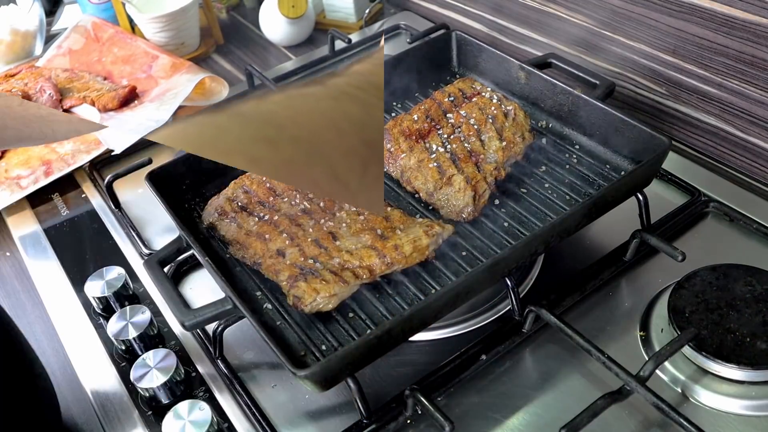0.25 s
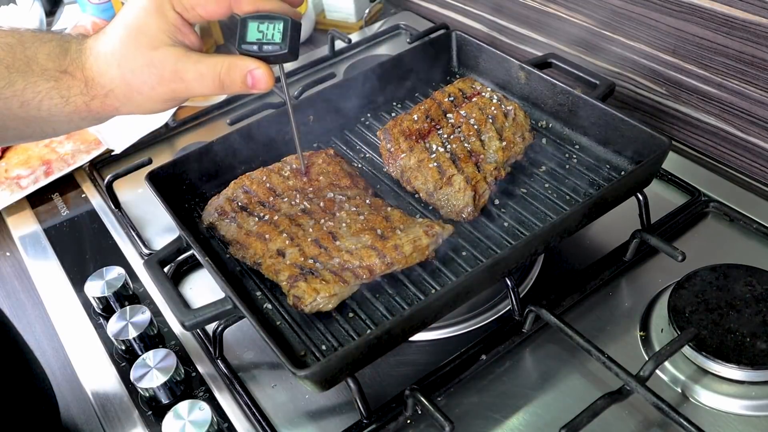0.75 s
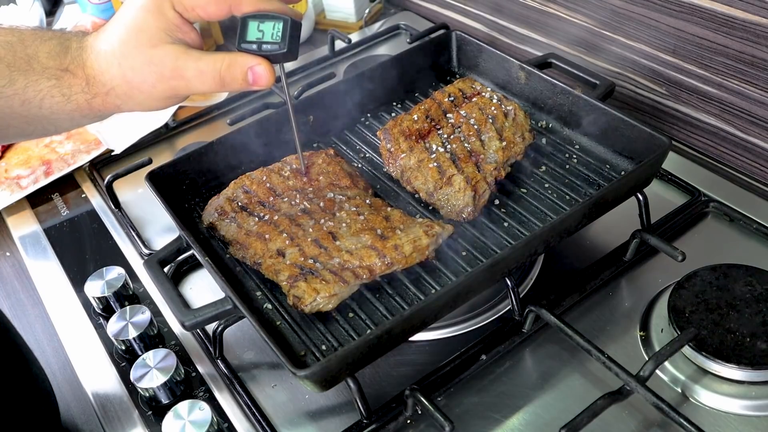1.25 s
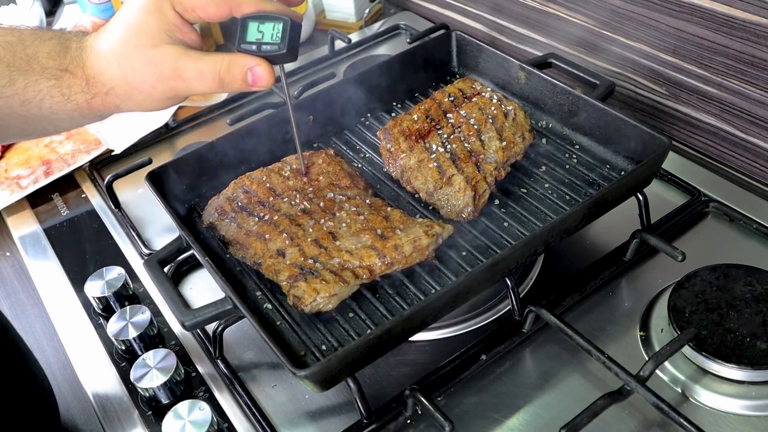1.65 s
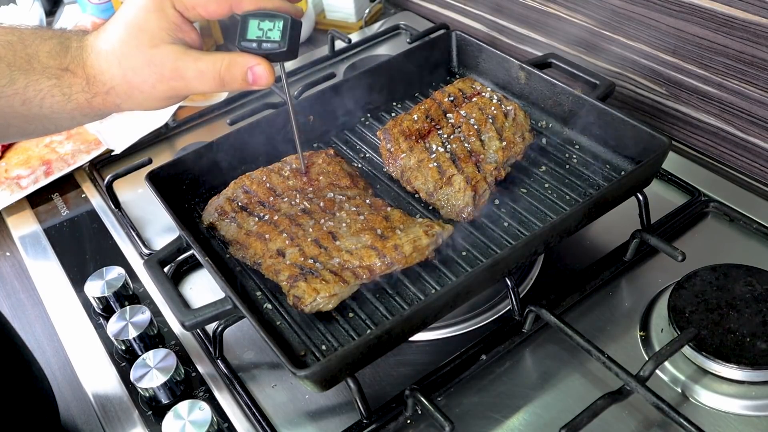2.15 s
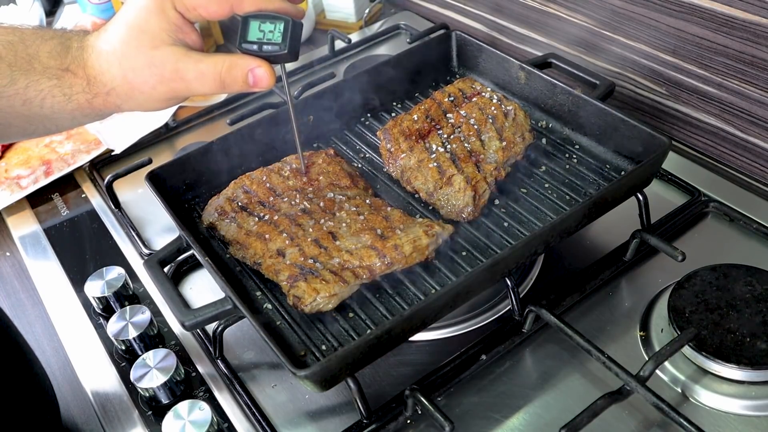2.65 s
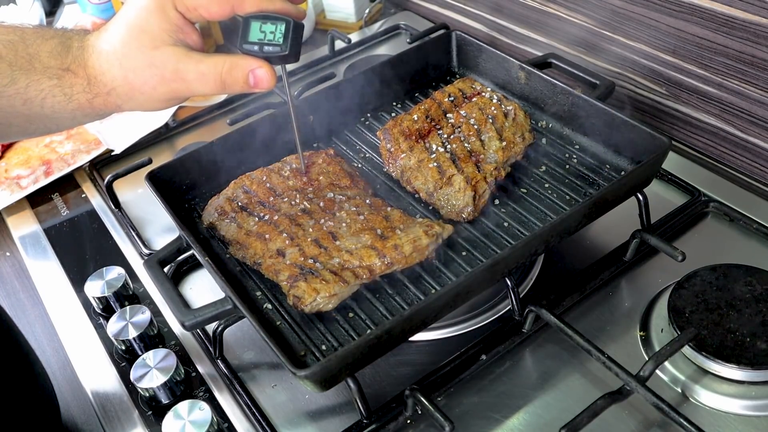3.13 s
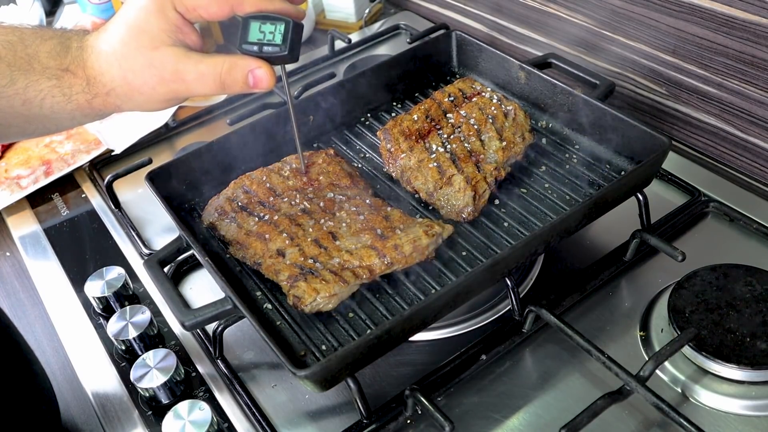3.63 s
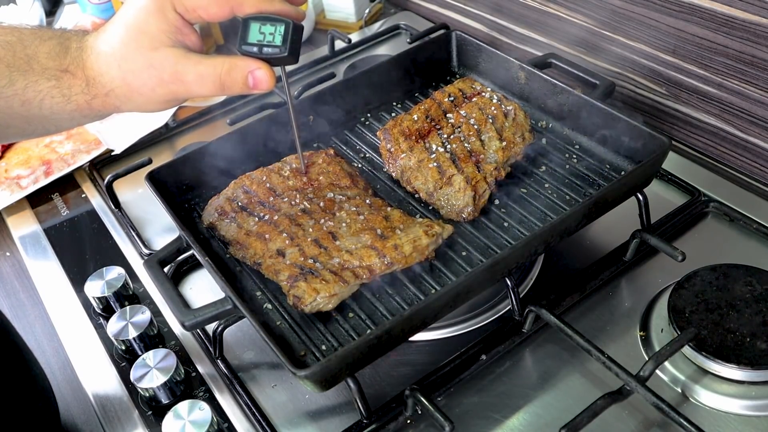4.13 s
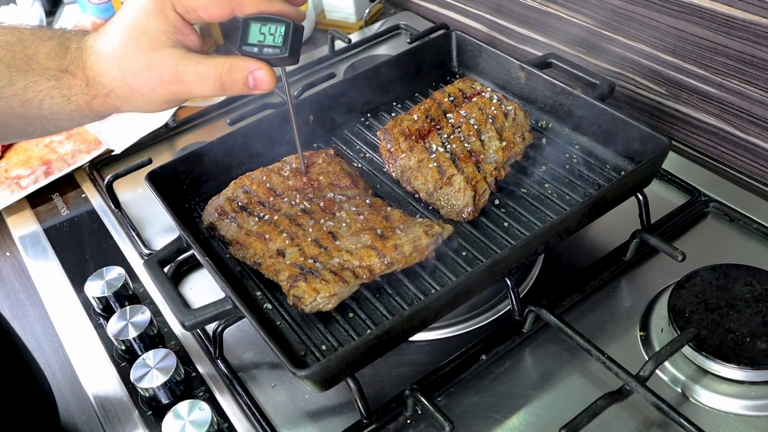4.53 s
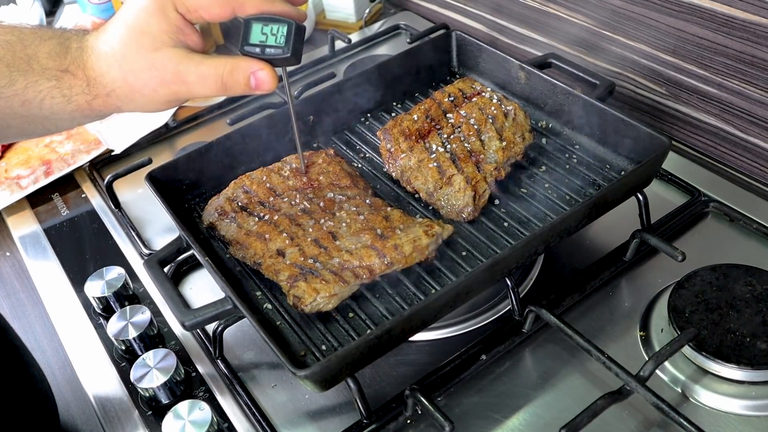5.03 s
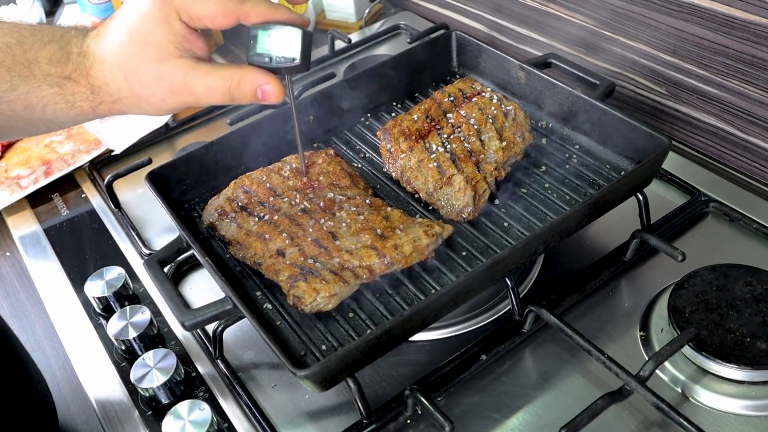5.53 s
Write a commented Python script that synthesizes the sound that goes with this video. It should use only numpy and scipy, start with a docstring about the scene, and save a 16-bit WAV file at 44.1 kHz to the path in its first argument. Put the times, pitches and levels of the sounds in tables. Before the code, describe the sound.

A steady, already running sizzle of meat in hot fat, crisp and airy with a slight metallic pan colour. Random tiny crackles cover it; a strong pop comes just after two seconds, then clusters of snaps until the end. Brief spurts of steam blend in. Close microphone, centred, short dry kitchen reflections, soft low gas rush, and one barely noticeable dull bump near five seconds.

```python
"""A small kitchen: two steaks sear in a cast-iron grill pan, heard close up and in mono.
Water boiling out into hot fat is a dense sizzle of tiny decaying bursts and noise, coloured by the pan.
Single drops pop as filtered clicks with echoes off the pan; juice spurts into steam as swells of hiss.
Pops and spurts stir a short room tail; under it all are a noise-made gas flame, a faint hum and one soft bump."""
import sys
import numpy as np
from scipy import signal
from scipy.fft import rfft, irfft, next_fast_len
from scipy.io import wavfile
from scipy.ndimage import map_coordinates

SR = 44100
rng = np.random.default_rng(int(sys.argv[2]) if len(sys.argv) > 2 else 0)


def generate_wav(sig):
    """Save sig (samples, or channels by samples) to the path in sys.argv[1] as 16-bit PCM at SR."""
    pcm = np.round(np.clip(np.atleast_2d(sig).T, -1, 1) * 32767).astype(np.int16)
    wavfile.write(sys.argv[1], SR, pcm)


N = 255202  # length in samples


def amp(db):
    """Decibels to gain."""
    return 10 ** (np.asarray(db) / 20)


def unit(x):
    """x scaled to rms 1."""
    return x / np.sqrt(np.mean(x ** 2) + 1e-20)


def along(points, hz):
    """A curve of (Hz, value) points, read on a log frequency axis."""
    point_hz, values = np.transpose(points)
    return np.interp(np.log(hz + 1), np.log(point_hz), values)


def wobble(rate):
    """A smooth random curve through `rate` random knots a second."""
    knots = rng.standard_normal(int(N * rate / SR) + 4)
    return map_coordinates(knots, [np.arange(N) * rate / SR])


def coloured(x, gain_db):
    """x through a minimum-phase filter, so attacks stay sharp; gain_db maps Hz to dB."""
    m = 2 * next_fast_len(len(x) // 2 + 4096)
    gain = amp(gain_db(np.fft.rfftfreq(m, 1 / SR)))
    cepstrum = irfft(np.log(gain + 1e-6), m)
    # folding the cepstrum onto positive time makes the filter causal
    cepstrum[1:m // 2] *= 2
    cepstrum[m // 2 + 1:] = 0
    response = np.exp(rfft(cepstrum))
    return irfft(rfft(x, m) * response, m)[:len(x)]


def hump(centre_hz, q):
    """Gain in dB of one broad resonance, as a function of frequency."""
    return lambda hz: -10 * np.log10(1 + (q * (hz / centre_hz - centre_hz / (hz + 1))) ** 2)


def lift_db(resonances, hz):
    """The summed lift in dB of (Hz, width in Hz, dB) resonances at each frequency."""
    return sum(db / (1 + (2 * (hz - centre) / width) ** 2) for centre, width, db in resonances)


def add(track, s, sound):
    """Mix a sound into the track at time s, cut off at the track's end."""
    part = track[max(round(s * SR), 0):][:len(sound)]
    part += sound[:len(part)]


# The kitchen's steady hum. Each row: frequency in Hz, rms level in dB.
HUM_TONES = [(40, -69), (62.5, -56), (100, -69), (125, -75)]


def hum():
    """A few low sine tones whose phases wander a little, so the hum is slightly unsteady."""
    t = np.arange(N) / SR
    tones = 0
    for hz, db in HUM_TONES:
        drift = 0.32 * wobble(4.74)  # radians
        tones = tones + amp(db) * np.sqrt(2) * np.sin(2 * np.pi * hz * t + drift)
    return tones


# The colour of the gas flame. Each row: frequency in Hz, relative level in dB per Hz.
FLAME_COLOUR = [(15, -11), (35, -14), (70, -6.5), (140, -1.5), (250, -3.5), (380, -2.5), (550, -5),
                (1200, -8.5), (4000, -60)]


def burner(flame_db=-48):
    """A burning gas jet's turbulence makes a low rush: steady noise, coloured."""
    return amp(flame_db) * unit(coloured(rng.standard_normal(N), lambda hz: along(FLAME_COLOUR, hz)))


def bump(at_s=5.0, level_db=-45.5, centre_hz=260, half_s=0.12):
    """A soft low bump: resonant noise under a bell-shaped swell, half_s from peak to 1/e."""
    t = np.arange(N) / SR
    rumble = unit(coloured(rng.standard_normal(N), lambda hz: 2 * hump(centre_hz, q=1.6)(hz)))
    return amp(level_db) * rumble * np.exp(-((t - at_s) / half_s) ** 2)


def kitchen(x, level_db=-12, t60_s=0.3, size=SR // 3):
    """The small room's diffuse answer: a decaying noise tail that starts after 5 ms."""
    t = np.arange(size) / SR
    tail = rng.standard_normal(size) * amp(-60 * t / t60_s) * (t > .005)
    return amp(level_db) * signal.fftconvolve(x, tail / np.linalg.norm(tail))[:N]


# The bursting bubbles together. Each row: frequency in Hz, relative level in dB per Hz.
SIZZLE_COLOUR = [(150, -18), (600, -16.5), (850, -10), (1100, -9), (1300, -4), (3200, -8.5), (4500, -3),
                 (5700, -4.5), (7000, -1.5), (8500, 1.5), (10000, -5.5), (11200, -8), (12800, -3),
                 (15600, -8.5)]
# Air resonances of the pan and the hob. Each row: centre in Hz, width in Hz, lift in dB.
PAN_RESONANCES = [(723, 40, 8.5), (944, 41, 4), (1375, 22, 7.5), (2240, 560, 4), (2890, 340, 5),
                  (3734, 670, 5.5), (5220, 69, 5), (6075, 140, 4)]


def sizzle_db(hz):
    """The colour of anything that bursts in the pan: bubbles plus pan resonances."""
    return along(SIZZLE_COLOUR, hz) + lift_db(PAN_RESONANCES, hz)


# Juice that runs onto the iron and flashes to steam.
# Each row: start in seconds, level in dB before level_db, pitch in Hz, nominal length in seconds.
STEAM_SPURTS = [(2.25, -21, 13000, 0.022), (2.295, -27, 8550, 0.058), (2.376, -23, 8900, 0.096),
                (3.817, -26, 7600, 0.089), (4.221, -20.5, 7000, 0.041), (4.593, -24.5, 6200, .04)]


def spurts(level_db=-1, q=1.1, uneven_db=11, sputter_db=1.6, sputter_per_s=200):
    """A swarm of like-sized bubbles: uneven noise around one pitch that swells quickly and dies away."""
    track = np.zeros(N)
    t = np.arange(SR // 3) / SR
    for s, db, pitch_hz, length in STEAM_SPURTS:
        swarm = rng.standard_normal(len(t)) * amp(uneven_db * rng.uniform(-1.1, 1, len(t)))
        # a higher q makes the bubbles more alike in size
        hiss = unit(coloured(swarm, lambda hz: 2 * hump(pitch_hz, q)(hz) + sizzle_db(hz)))
        age = 3 * t / length  # the swell peaks at age 1, a third of the length
        swell = age * np.exp(1 - age)
        sputter = sputter_db * wobble(sputter_per_s)[:len(t)]
        add(track, s, amp(db + level_db + sputter) * swell * hiss)
    return track


def paths(wall_s=.0013, wall_db=-2, rib_db=-13, rib_t60=0.003, scatter_db=-24, scatter_t60=0.072, size=SR // 25):
    """The way from one spot in the pan: direct, off the ribs and the wall, and scattered by the hob."""
    t = np.arange(size) / SR
    ribs = amp(rib_db - 60 * t / rib_t60)
    hob = amp(scatter_db - 60 * t / scatter_t60)
    response = (ribs + hob) * rng.standard_normal(size)
    response[0] = 1  # direct sound
    add(response, wall_s * rng.uniform(0.92, 1.15), [amp(wall_db)])
    return response


# What a bursting drop rings with. Each row: centre in Hz, width in Hz, lift in dB.
DROP_RING = [(1360, 150, 1), (2360, 470, 5.5), (3710, 350, 4), (5790, 400, 5.5)]


def pop(pitch_hz, q=0.51):
    """One bursting drop: a click and its pan echoes, coloured around its pitch."""
    wave = coloured(paths(), lambda hz: sizzle_db(hz) + lift_db(DROP_RING, hz) + 2 * hump(pitch_hz, q)(hz))
    # rms 1 if all the energy fell within 3 ms
    return wave * np.sqrt(.003 * SR / np.sum(wave ** 2))


def spatter(level_db=-4.5, spread_db=2.0, low_hz=2400, high_hz=13000, count=260):
    """Smaller drops burst at random times, harder when the fat boils harder."""
    track = np.zeros(N)
    when, pitch, chance = rng.random((count, 3)).T
    times = when * N / SR
    crackle_db, _ = boil(times)
    strong_db = spread_db * np.minimum(-np.log(chance), 3)  # few drops are much stronger
    levels_db = crackle_db + level_db + strong_db
    pitches_hz = low_hz * (high_hz / low_hz) ** pitch
    for s, db, hz in zip(times, levels_db, pitches_hz):
        add(track, s, amp(db) * pop(hz))
    return track


# Large drops that burst in the fat.
# Each row: start in seconds, level in dB before level_db (energy taken over 3 ms), pitch in Hz.
LARGE_POPS = [(0.1602, -27.5, 2800), (0.535, -22, 7800), (1.3242, -26, 5000), (1.878, -27, 3000),
              (2.019, -25, 6400), (2.0654, -23.5, 4330), (2.1322, -16.5, 4600), (2.676, -23, 3100),
              (2.743, -21, 7400), (2.8452, -22.5, 6100), (2.936, -23.5, 3200), (3.2724, -22.5, 4300),
              (3.376, -24.5, 3900), (3.736, -23, 4700), (3.8028, -23, 4300), (3.9058, -19, 3200),
              (3.972, -22, 3100), (4.4853, -18.5, 2700), (4.7337, -21, 2620), (4.851, -20.5, 2500),
              (5.0461, -21.5, 2800), (5.26, -22, 10100), (5.49, -17, 5340), (5.6322, -21, 6600),
              (5.727, -22.5, 4600), (5.7596, -21.5, 3500)]


def pops(level_db=4.3):
    """The large drops that stand out of the sizzle."""
    track = np.zeros(N)
    for s, db, hz in LARGE_POPS:
        add(track, s, amp(db + level_db) * pop(hz))
    return track


# How hard the fat boils. Each row: time in seconds, level of the fizz in dB before its trim.
BOIL_CURVE = [(0, -29.5), (0.11, -31.5), (0.2, -27.5), (1.15, -29), (1.55, -26.5), (1.95, -28.5),
              (2.17, -26), (2.28, -25), (2.68, -26), (2.91, -23.5), (3.05, -26), (3.7, -26.5), (4.15, -27),
              (4.35, -26.5), (4.75, -27), (5.48, -27.5), (5.77, -23.5)]
CRACKLE_DB, CRACKLE_FOLLOWS = -30.5, 0.5  # crackle: centre level in dB, dB gained per dB of fizz


def boil(t):
    """Levels in dB of crackle and fizz at times t: a harder boil mostly adds small bubbles."""
    s, db = np.transpose(BOIL_CURVE)
    fizz_db = np.interp(t, s, db)
    crackle_db = CRACKLE_DB + CRACKLE_FOLLOWS * (fizz_db - fizz_db.mean())
    return crackle_db, fizz_db


def burst(phase, life):
    """A bursting bubble: a pressure swing that decays to 1/e in `life` cycles."""
    return np.sin(2 * np.pi * phase) * np.exp(-phase / life)


def bubbles(count, spread_db, life, size=80):
    """Tiny bursts at random times, pitches and strengths, roughly even in colour, at rms 1."""
    when, pitch = rng.random((2, count))
    hz = 900 + 15000 * pitch
    uneven_db = spread_db * np.clip(rng.standard_normal(count), -3, 2.6)
    strength = amp(uneven_db) * np.sqrt(hz)  # makes up for the shorter life of high bursts
    waves = strength[:, None] * burst(hz[:, None] * np.arange(size) / SR, life)
    places = (when * N).astype(int)[:, None] + np.arange(size)
    x = np.bincount(places.ravel(), waves.ravel(), N + size)[:N]
    return unit(x - x.mean())


def sizzle(fizz_trim_db=0.62, split_hz=5500, wash_db=-2, flurry_db=0.28, flutter_db=0.31, flutter_per_s=40):
    """Large bubbles crackle low and small ones fizz high, over a wash of bursts too dense to tell apart."""
    crackle_db, fizz_db = boil(np.arange(N) / SR)
    below = lambda hz: -10 * np.log10(1 + (hz / split_hz) ** 6)
    above = lambda hz: -10 * np.log10(1 + (split_hz / (hz + 1)) ** 6)
    # the wash is plain noise
    large = bubbles(count=20000, spread_db=1.1, life=0.31) + amp(wash_db) * rng.standard_normal(N)
    small = bubbles(count=28000, spread_db=2.0, life=0.35) + amp(wash_db) * rng.standard_normal(N)
    crackle = unit(coloured(large, lambda hz: sizzle_db(hz) + below(hz)))
    fizz = unit(coloured(small, lambda hz: sizzle_db(hz) + above(hz)))
    clumps = flurry_db * (wobble(35) + wobble(140))  # bubbles come in clumps
    flutter = flutter_db * wobble(flutter_per_s)  # the boil is never quite even
    crackle *= amp(crackle_db + clumps + CRACKLE_FOLLOWS * flutter)
    fizz *= amp(fizz_db + fizz_trim_db + clumps + flutter + 0.19 * wobble(60))
    return crackle + fizz


def scene():
    """Stove, room and pan, the same in both channels; the room answers only the sharp sounds."""
    background = burner() + hum() + bump()
    spits = spurts() + spatter() + pops()
    mono = background + kitchen(spits) + spits + sizzle()
    return np.array([mono, mono])


def record(dry, top_hz=15730):
    """A steep low-pass: nothing is kept from top_hz upwards."""
    m = next_fast_len(N + SR // 4)
    passed = np.fft.rfftfreq(m, 1 / SR) < top_hz
    return irfft(rfft(dry, m) * passed, m)[:, :N]


dry = scene()
out = record(dry)
generate_wav(out)
```